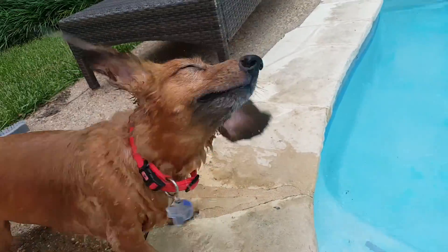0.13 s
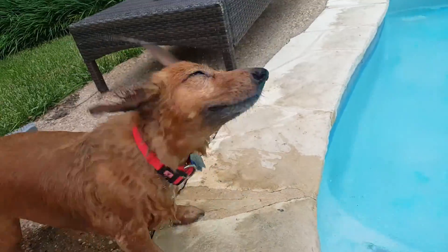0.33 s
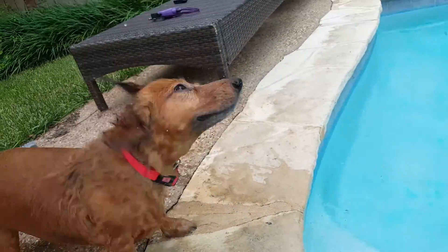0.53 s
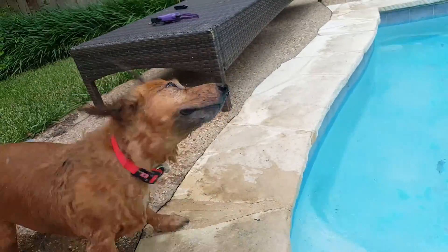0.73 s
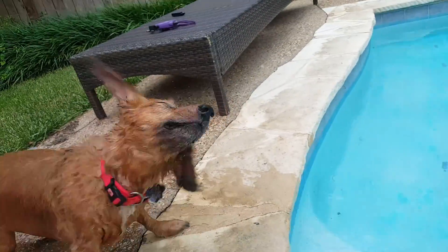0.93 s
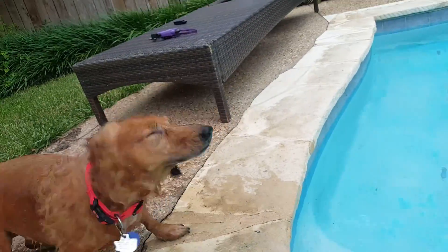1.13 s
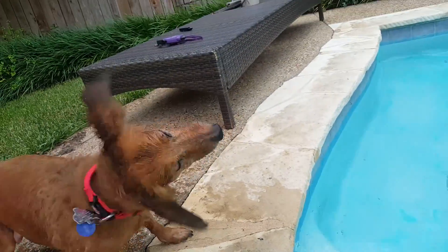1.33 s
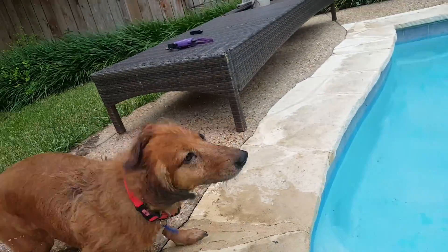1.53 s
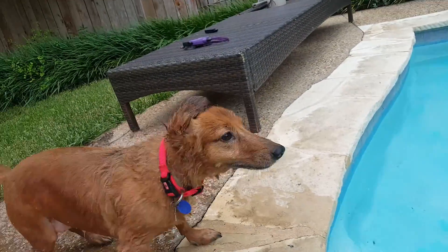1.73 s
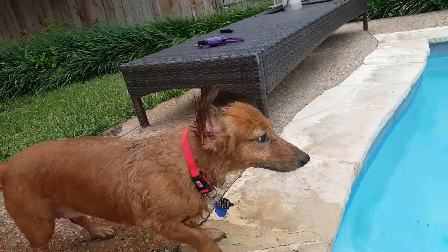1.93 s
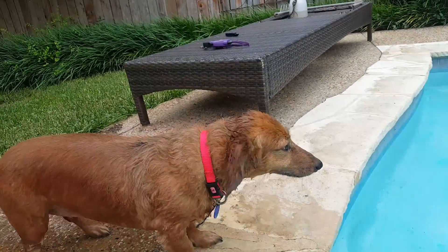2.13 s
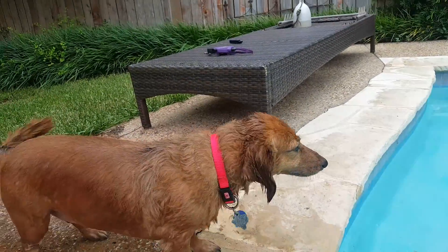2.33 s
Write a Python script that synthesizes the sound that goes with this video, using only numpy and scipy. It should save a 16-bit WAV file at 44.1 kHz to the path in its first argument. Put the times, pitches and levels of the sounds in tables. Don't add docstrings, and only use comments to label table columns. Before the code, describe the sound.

A dog's collar tags clatter in a dense, irregular rattle with dull wet ear flaps and fur rustle, then settle to a few tiny clinks under wind rumble and steady hiss; open yard, close microphone, metal stronger on the left.

```python
import sys
import numpy as np
from scipy import signal
from scipy.fft import rfft, irfft, next_fast_len
from scipy.io import wavfile
from scipy.ndimage import uniform_filter1d, map_coordinates

SR = 44100
rng = np.random.default_rng(int(sys.argv[2]) if len(sys.argv) > 2 else 0)


def attenuation_scalar(level_db):
    decades = np.asarray(level_db, float) / 20
    return 10 ** decades


def generate_wav(sig):
    pcm = np.round(np.clip(np.atleast_2d(sig).T, -1, 1) * 32767).astype(np.int16)
    wavfile.write(sys.argv[1], SR, pcm)


N = 108794

# start_s, peak_db, pitch_hz
TAG_CLACKS = [(0.0902, -36, 2650), (0.0915, -17.5, 2440), (0.1044, -21.5, 3260), (0.1143, -21.5, 7030),
              (0.1371, -20.5, 6550), (0.2129, -22.5, 3360), (0.2244, -25.5, 3120), (0.2449, -23, 3140),
              (0.3249, -24.5, 2660), (0.3388, -17, 3360), (0.4393, -32, 6930), (0.5498, -24.5, 7830),
              (0.5704, -22, 2910), (0.5792, -21.5, 6500), (0.5907, -16, 6900), (0.6913, -19.5, 7540),
              (0.7479, -23.5, 2960), (0.7758, -16, 3020), (0.7928, -13, 7840), (0.8879, -27, 5720),
              (0.9236, -26.5, 3330), (0.965, -17.5, 2880),
              (0.9907, -18, 7500), (1.0328, -25.5, 7660), (1.058, -22.5, 6830), (1.0717, -17.5, 3500),
               (1.1095, -20.5, 3030), (1.1438, -22, 5000), (1.1693, -29, 7900), (1.1927, -20.5, 6980),
               (1.2454, -18, 6920), (1.3313, -21, 3280), (1.3425, -20, 6880), (1.3985, -22, 7080),
               (1.433, -15, 7700), (1.498, -13, 7440), (1.5397, -16.5, 6770), (1.6554, -14, 5110),
               (1.6598, -18, 5240), (1.669, -15, 6430), (1.7166, -19.5, 8340), (1.731, -15.5, 6850),
              (1.7898, -40, 7720), (1.811, -37, 6850), (1.8476, -43, 6740), (1.85, -29, 3280),
                   (1.9099, -32, 6950), (1.9662, -34.5, 6800), (2.189, -50, 3300), (2.342, -49, 3270),
                   (2.4398, -35, 6290),
              (0.0876, -20.5, 2250), (0.1287, -25.5, 7600), (0.181, -31, 6820), (0.374, -34.5, 7830),
                (0.399, -41, 7700), (0.4485, -28.5, 5230), (0.4648, -28.5, 2500), (0.6033, -21, 6810),
                (0.6513, -28.5, 7050), (0.716, -31.5, 7700), (0.7779, -24, 2800), (0.7838, -22.5, 8160),
                (0.805, -25, 7640), (0.819, -20.5, 7750), (0.9014, -30, 6930), (0.9347, -23, 3280),
                (0.9534, -19, 3010), (0.9774, -23.5, 7840), (1.024, -21.5, 7860), (1.0652, -18, 6970),
                (1.1756, -24, 8140), (1.281, -24.5, 5140), (1.3564, -28, 2540), (1.3744, -27.5, 7560),
                (1.4122, -24, 7000), (1.444, -26, 7680), (1.4953, -22, 6740), (1.5199, -16.5, 6960),
                (1.5631, -23, 6930), (1.5781, -26, 6890), (1.5892, -25, 7200), (1.6322, -22.5, 6950),
                (1.6812, -18.5, 5160), (2.0048, -48, 7740), (2.2384, -53, 6900)]
CONTACTS = TAG_CLACKS


def unit(x):
    return x / np.sqrt(np.mean(x ** 2) + 1e-20)


def along(points, hz):
    point_hz, point_db = np.transpose(points)
    gain_db = np.interp(np.log(hz + 1), np.log(point_hz + 1), point_db, left=point_db[0] - 20)
    return attenuation_scalar(gain_db)


def curves(rows):
    time_s, *columns = np.transpose(rows)
    return [np.interp(np.arange(N) / SR, time_s, column) for column in columns]


def wobble(rate_hz):
    knots = rng.standard_normal((2, 2000))
    position = np.arange(N) * rate_hz / SR
    return np.array([map_coordinates(k, [position]) for k in knots])


def coloured(x, points):
    size = 2 * next_fast_len(N // 2 + 4096)
    cepstrum = irfft(np.log(along(points, np.fft.rfftfreq(size, 1 / SR))), size)
    cepstrum[1:size // 2] *= 2
    cepstrum[size // 2 + 1:] = 0
    response = np.exp(rfft(cepstrum))
    return irfft(rfft(x, size) * response, size)[..., :N]


def add(track, start_s, sound):
    part = track[..., round(start_s * SR):][..., :sound.shape[-1]]
    part += sound[..., :part.shape[-1]]


def burst(t, peak_s):
    return (t / peak_s * np.exp(1 - t / peak_s)) ** 2


def hiss():
    # freq_hz, level_db_per_hz
    hiss_spectrum = [(410, -26), (700, -15.5), (840, -19.5), (3090, -23.5), (4160, -29), (11800, -36.5),
                     (15700, -1.5)]
    level_db = -41 + 5.5
    return attenuation_scalar(level_db) * unit(coloured(rng.standard_normal((2, N)), hiss_spectrum))


def wind():
    # time_s, level_db
    wind_level = [(0, -34.5), (.15, -37), (.18, -44), (.5, -41), (.62, -35.5), (.69, -43.5), (1.32, -46.5),
                  (1.45, -42.5), (1.77, -41.5), (1.82, -43.5), (1.98, -40), (2.08, -34), (2.24, -36),
                  (2.34, -37.5), (2.4, -42.5), (2.46, -42)]
    # freq_hz, level_db_per_hz
    rumble_spectrum = [(20, -33.5), (64, -5), (180, 3), (370, -8), (810, -26.5), (1500, -62.5)]
    lumps_db, lump_rate_hz, gust_bright, trim_db = 3.5, 25.385, 0.3, 5.0
    level_db, = curves(wind_level)
    noise = rng.standard_normal((2, N))
    lumps = attenuation_scalar(lumps_db * 2 * np.tanh(wobble(lump_rate_hz) / 2))
    rumble = unit(coloured(noise * lumps, rumble_spectrum))
    upper = coloured(rumble, [(40, -18.5), (110, 8.5), (300, 2.5)])
    gust = attenuation_scalar(gust_bright * (level_db - level_db.max()))
    return attenuation_scalar(level_db + trim_db) * (rumble + (gust - 1) * upper)


def coat():
    # time_s, level_db
    rustle_level = [(0, -49.5), (.15, -44), (1.2, -43.5), (1.72, -41), (1.82, -50), (2.46, -66)]
    # freq_hz, level_db_per_hz
    fur_spectrum = [(350, -41), (600, -7.5), (5840, -11), (6870, -6), (10200, -22), (15000, -4.5)]
    trim_db, lumps_db, lump_rate_hz = 3, 5, 59.99
    lumps = attenuation_scalar(lumps_db * wobble(lump_rate_hz)[0])
    rustle = lumps * rng.standard_normal((2, N))
    return attenuation_scalar(curves(rustle_level)[0] + trim_db) * unit(coloured(rustle, fur_spectrum))


def pops():
    # start_s, peak_db, pitch_hz
    eddies = [(0.049, -28.5, 132), (0.127, -24, 190), (0.611, -21.5, 170), (0.624, -26, 203),
              (1.455, -25, 100), (1.62, -30, 202), (1.684, -26, 190), (1.753, -29.5, 105),
              (2.063, -26.5, 136), (2.079, -24.5, 108), (2.114, -21.5, 235), (2.154, -26.5, 250),
              (2.209, -27.5, 213)]
    peak_cycles, trim_db, port_spread_db = 0.67, -1.5, 2.4
    out, t = np.zeros((2, N)), np.arange(SR // 10) / SR
    for start_s, peak_db, pitch_hz in eddies:
        gain = attenuation_scalar(peak_db + trim_db + port_spread_db * rng.standard_normal((2, 1)))
        push = burst(t, peak_cycles / pitch_hz) * np.sin(2 * np.pi * pitch_hz * t)
        add(out, start_s - .004, gain * push)
    return out


def ears():
    # start_s, peak_db, left_minus_right_db
    slaps = [(0.087, -22, -8), (0.212, -28, -3), (0.245, -33.5, -4), (0.325, -21, 2), (0.439, -30.5, 5),
             (0.551, -30, 11), (0.69, -31.5, -5), (0.75, -29, 4), (0.846, -24, 1), (0.885, -35.5, -9),
             (0.932, -26.5, 7), (1.023, -28, 9), (1.059, -33.5, -1), (1.107, -25, -0.5), (1.189, -26.5, -3),
             (1.244, -37.5, -8), (1.274, -28.5, -13.5), (1.376, -30.5, 1), (1.437, -28.5, 13.5),
             (1.516, -23, 9.5), (1.597, -20, 1), (1.678, -25.5, -12.5), (1.714, -27.5, 9)]
    # freq_hz, level_db
    skin_spectrum = [(150, 10), (500, -6), (1200, 3), (2500, -2.5), (5000, -5.5), (9000, -28), (15000, -22)]
    slap_s, grit_db, wet_db = 0.0032, 9.5, -2
    thump_db, thump_hz = -1.5, 419
    out, t = np.zeros((2, 2, N)), np.arange(SR // 20) / SR
    for start_s, peak_db, pan_db in slaps:
        a, b, c = rng.standard_normal((3, len(t)))
        grit = np.tanh(np.repeat(c, 30)[:len(t)])
        wet = attenuation_scalar(wet_db + grit_db * grit) * [a, 0.58 * a + 0.38 * b]
        pitch_hz = thump_hz * (1 + 0.18 * c[-1])
        thump = attenuation_scalar(thump_db) * np.sin(2 * np.pi * pitch_hz * t) * np.exp(-t / slap_s)
        pan = attenuation_scalar(peak_db + np.array([[.5], [-.5]]) * pan_db)
        both = np.array([wet, thump * np.ones((2, 1))])
        add(out, start_s - .001, pan * burst(t, slap_s) * both)
    return coloured(out[0], skin_spectrum) + out[1]


def clacks():
    # freq_hz, level_db
    tick_spectrum = [(1000, -44.5), (2500, 2.5), (7000, -3.5), (10000, -8), (15000, -8)]
    ping_s, ping_db, roughness = 0.0016, -8, 0.25
    crack_s, crack_db = .0012, -6.5
    pings, cracks, t = np.zeros(N), np.zeros(N), np.arange(SR // 30) / SR
    for start_s, peak_db, pitch_hz in CONTACTS:
        a, b = rng.standard_normal((2, len(t)))
        shape = attenuation_scalar(peak_db) * burst(t, ping_s * 0.78 ** b[0])
        rough = 1 + roughness * unit(uniform_filter1d(a, size=30))
        add(pings, start_s - .0007, attenuation_scalar(ping_db) * shape * rough * np.sin(2 * np.pi * pitch_hz * t))
        add(cracks, start_s - .0007, attenuation_scalar(peak_db + crack_db) * burst(t, crack_s) * b)
    return pings + coloured(cracks, tick_spectrum)


def rattle(count, size):
    scatter_s, level_db, force_db, grain_s = .004, -15.5, 6.1, 0.00048
    centre_hz, pitch_spread = 3744, 0.42
    start_s, peak_db, _ = np.repeat(CONTACTS, count, axis=0).T
    lag, force, pitch = rng.standard_normal((3, len(start_s)))
    t = np.arange(size) / SR
    grain_start_s = start_s + .002 + scatter_s * lag * np.abs(lag)
    at = (grain_start_s[:, None] * SR).astype(int) + np.arange(size)
    pitch_hz = np.clip(centre_hz * np.exp(pitch_spread * pitch), 1500, 9000)[:, None]
    gain = attenuation_scalar(peak_db + level_db + force_db * force)[:, None]
    grains = gain * burst(t, grain_s) * np.sin(2 * np.pi * pitch_hz * t)
    return np.bincount(at.ravel(), grains.ravel(), N + SR)[:N]


def rings():
    # start_s, length_s, low_tag_db, middle_tag_db, high_tag_db
    free_spells = [(0.111, 0.013, -35, -41, -58), (0.135, 0.023, -41, -36, -52),
                   (0.178, 0.04, -46, -49, -59), (0.348, 0.011, -63, -45, -61),
                   (0.367, 0.045, -57, -47.5, -65), (0.587, 0.031, -39, -38.5, -42.5),
                   (0.671, 0.045, -47, -54, -55), (0.79, 0.039, -45, -31, -41),
                   (0.986, 0.055, -42, -39, -56.5), (1.024, 0.019, -58, -51, -65),
                   (1.055, 0.015, -37, -30.5, -34), (1.167, 0.012, -60, -33, -38.5),
                   (1.183, 0.029, -32.5, -39, -66), (1.246, 0.0096, -41, -33.5, -50.5),
                   (1.328, 0.02, -45, -39, -55), (1.392, 0.037, -35.5, -39, -45.5),
                   (1.43, 0.02, -36.5, -35, -40), (1.501, 0.027, -30, -55, -59),
                   (1.532, 0.06, -32, -36, -45), (1.635, 0.0068, -45, -46, -61),
                   (1.659, 0.018, -27, -27, -42.5), (1.727, 0.067, -49, -50, -55.5),
                   (1.82, 0.028, -50, -51, -63), (1.852, 0.114, -47.5, -50, -58),
                   (1.988, 0.29, -58, -54.5, -67), (2.232, 0.026, -60.5, -64, -66)]
    # freq_hz, level_db
    tag_modes = [
        [(6850, -6.5), (4110, -22)],
        [(7690, -9), (13620, -13.5)],
        [(11390, 0), (9830, -18)],
    ]
    buzz_depth = [0.13, 0.88, 0.58]
    rise_s, t60_s, choke_s, trim_db = 0.0012, 0.52, 0.0022, 12.5
    swing, flutter_db = 0.0026, 8.5
    out, t = np.zeros((len(tag_modes), N)), np.arange(SR // 3) / SR
    for start_s, length_s, *levels_db in free_spells:
        choke = np.exp(-np.maximum(t - length_s, 0) / choke_s)
        hold = (1 - np.exp(-t / rise_s)) * attenuation_scalar(-60 * t / t60_s) * choke
        shifts = 1 + swing * rng.standard_normal(len(tag_modes))
        voices = []
        for modes, tag_db, shift in zip(tag_modes, levels_db, shifts):
            voice = np.zeros(len(t))
            for mode_hz, mode_db in modes:
                voice += attenuation_scalar(tag_db + mode_db + trim_db) * hold * np.sin(2 * np.pi * mode_hz * shift * t)
            voices.append(voice)
        add(out, start_s, np.array(voices))

    def chatter(rate_hz):
        return np.vstack([wobble(rate_hz), wobble(rate_hz)])[:len(out)]

    flutter = attenuation_scalar(flutter_db * np.tanh(chatter(90)))
    buzz = 1 + np.array(buzz_depth)[:, None] * chatter(600)
    return np.sum(out * flutter * buzz, axis=0)


def plate():
    # start_s, length_s, level_db
    plate_spells = [
        (.145, .015, -50),
        (1.01, 0.013, -40),
        (1.471, 0.022, -44),
        (1.494, 0.0077, -24),
        (1.548, 0.02, -33),
        (1.735, 0.016, -52),
        (1.866, 0.089, -51),
    ]
    plate_hz, rise_s, choke_s, trim_db, waver_db = 4118, 0.0025, 0.0029, 3.0, 3.4
    out, t = np.zeros(N), np.arange(SR // 6) / SR
    for start_s, length_s, level_db in plate_spells:
        hold = (1 - np.exp(-t / rise_s)) * np.exp(-np.maximum(t - length_s, 0) / choke_s)
        add(out, start_s, attenuation_scalar(level_db + trim_db) * hold * np.sin(2 * np.pi * plate_hz * t))
    return out * attenuation_scalar(waver_db * wobble(70)[0])


def tags():
    # freq_hz, level_db
    shade_spectrum = [(0, -41), (1500, -0.5), (3000, -17.5), (5500, -4.5), (7000, -38.5), (8000, -4),
                      (11000, -17), (14000, -3)]
    left = 2 * clacks() + rings() + plate() + rattle(count=20, size=200)
    late = np.pad(left, (6, 0))[:N]
    return np.array([left, coloured(late, shade_spectrum)])


def yard(x):
    t60_s, gap_s = 0.15, .002
    t = np.arange(SR // 8) / SR
    tail = rng.standard_normal((2, len(t))) * attenuation_scalar(-60 * t / t60_s) * (t > gap_s)
    return signal.fftconvolve(x, tail / np.linalg.norm(tail[0]), axes=1)[:, :N]


def swish():
    # freq_hz, level_db
    brush_spectrum = [(6000, -33), (7000, 1), (8600, 2), (9500, -30)]
    start_s, rise_s, level_db = 2.03, 0.038, -53
    t = np.maximum(np.arange(N) / SR - start_s, 0)
    noise = unit(coloured(rng.standard_normal((2, N)), brush_spectrum))
    return attenuation_scalar(level_db) * burst(t, rise_s) * noise


def scene():
    yard_db = -13
    dog = ears() + tags()
    echoes = attenuation_scalar(yard_db) * yard(dog)
    return dog + echoes + coat() + swish() + wind() + pops() + hiss()


def band_limit(x):
    return signal.sosfilt(signal.butter(12, 17010, fs=SR, output="sos"), x)


def record(dry):
    top_hz = 15800
    narrow = coloured(dry, [(0, 0), (top_hz, 0), (top_hz + 100, -30), (top_hz + 900, -45)])
    return band_limit(narrow)


dry = scene()
out = record(dry)
generate_wav(out)
```